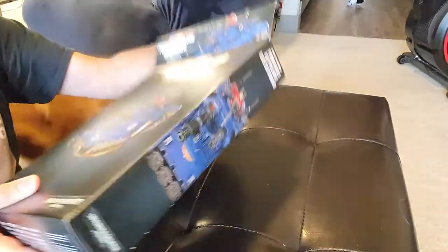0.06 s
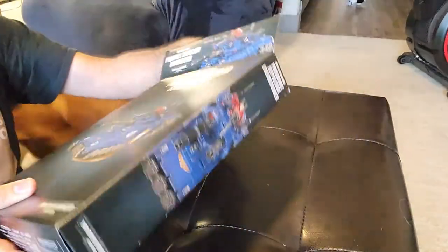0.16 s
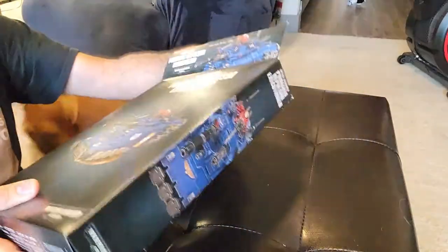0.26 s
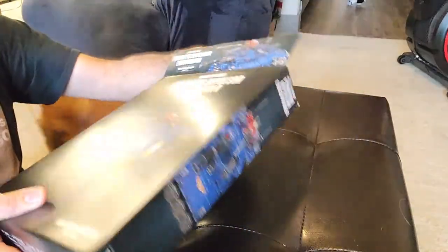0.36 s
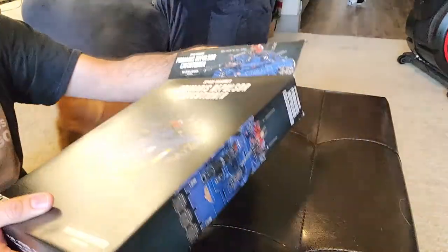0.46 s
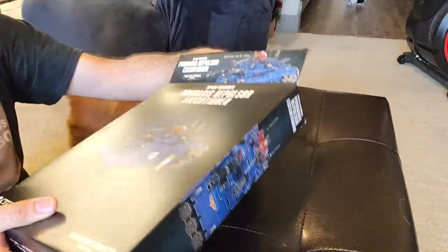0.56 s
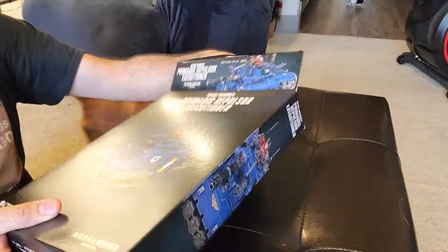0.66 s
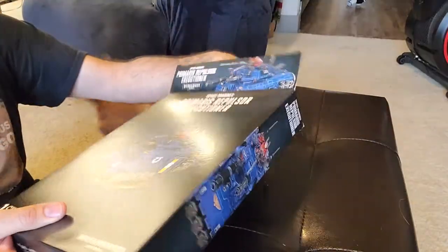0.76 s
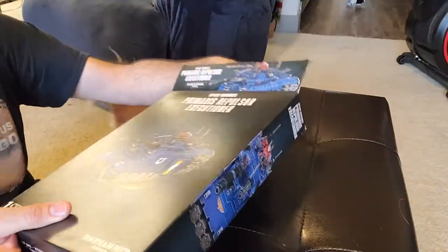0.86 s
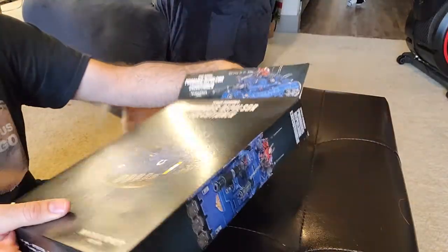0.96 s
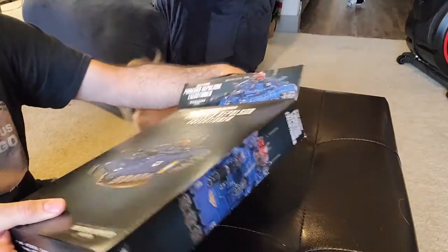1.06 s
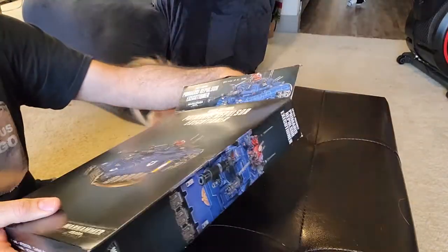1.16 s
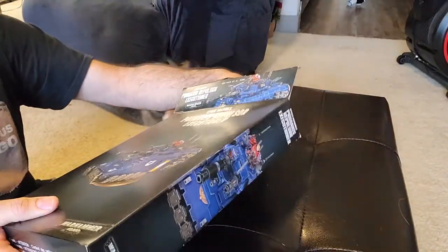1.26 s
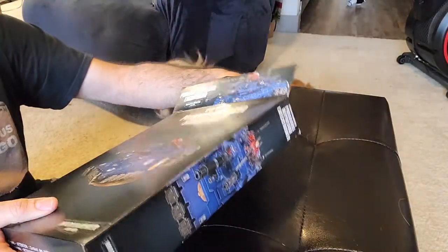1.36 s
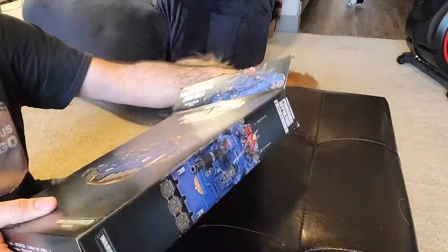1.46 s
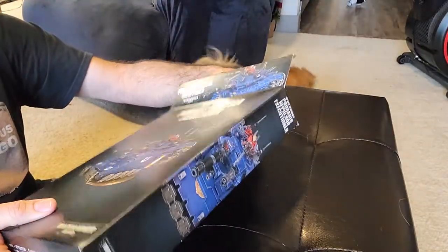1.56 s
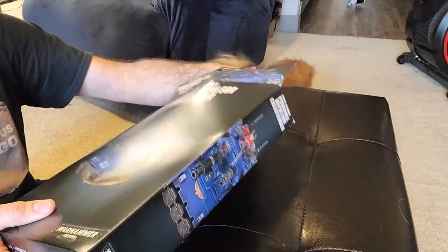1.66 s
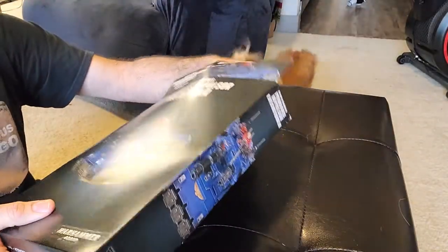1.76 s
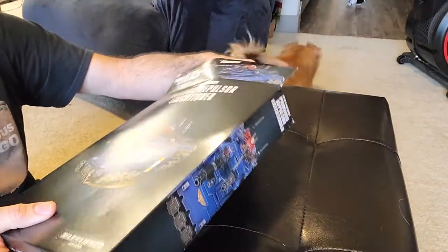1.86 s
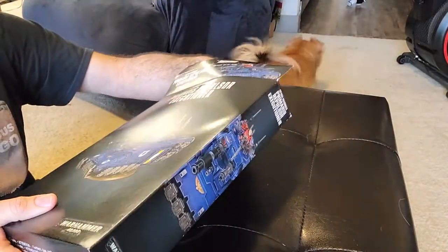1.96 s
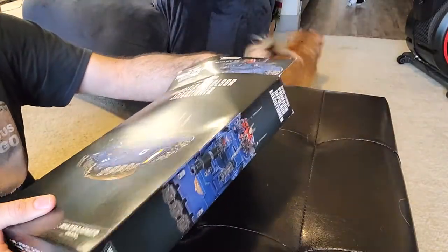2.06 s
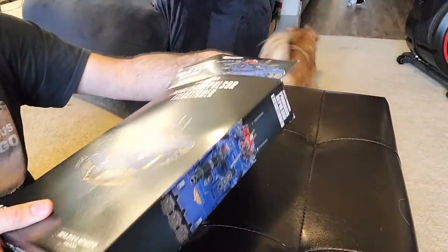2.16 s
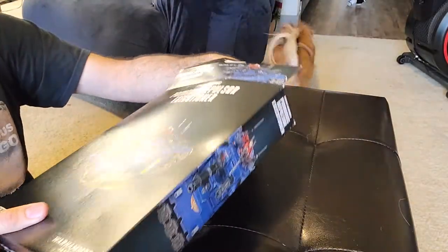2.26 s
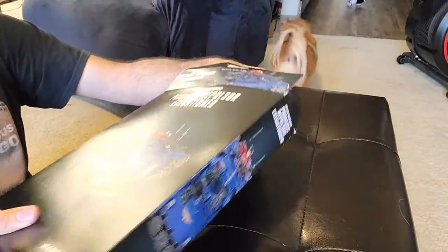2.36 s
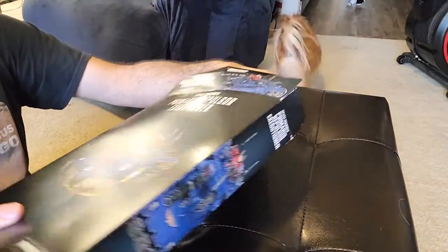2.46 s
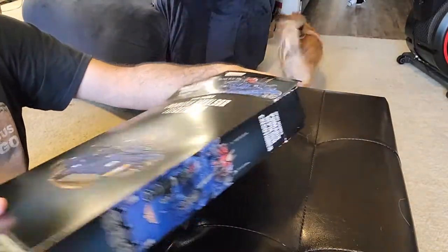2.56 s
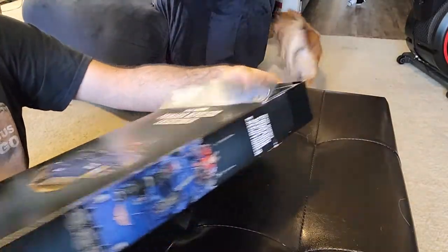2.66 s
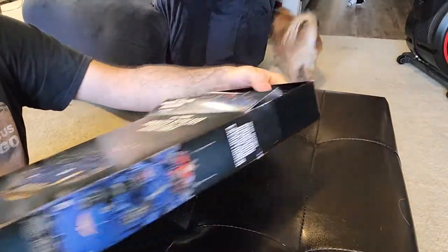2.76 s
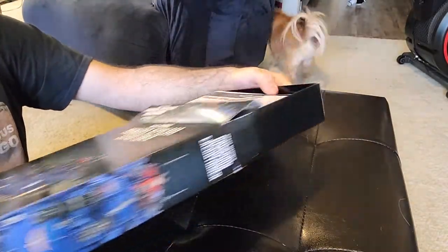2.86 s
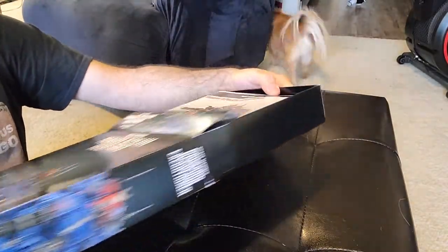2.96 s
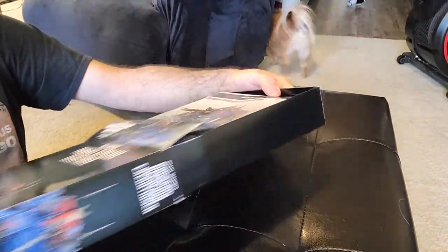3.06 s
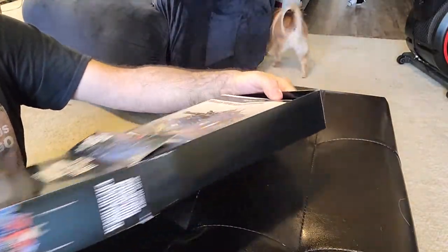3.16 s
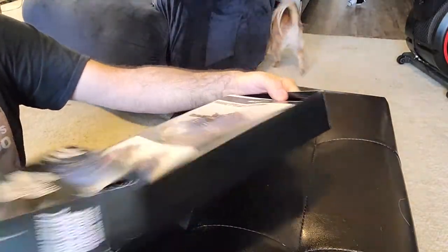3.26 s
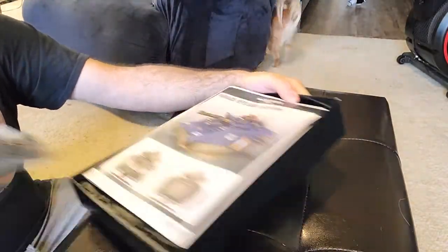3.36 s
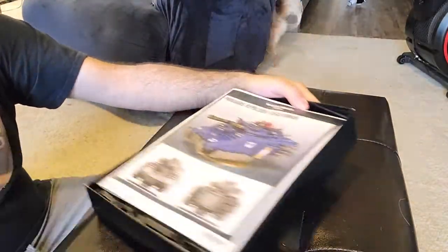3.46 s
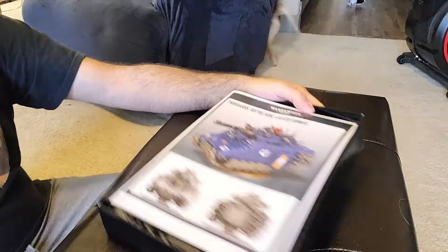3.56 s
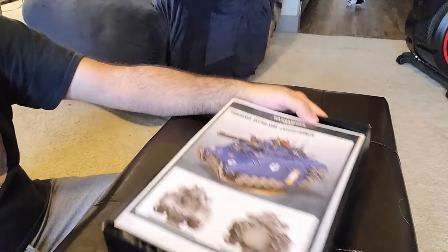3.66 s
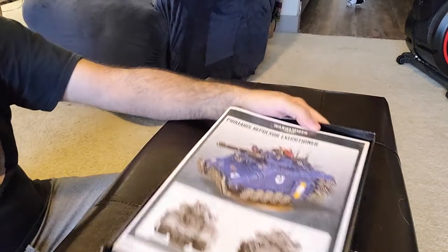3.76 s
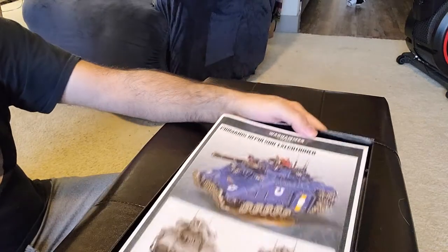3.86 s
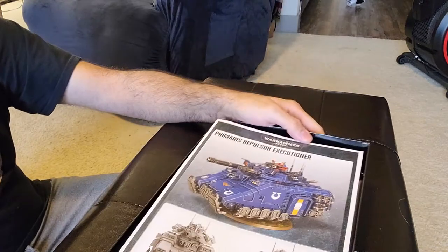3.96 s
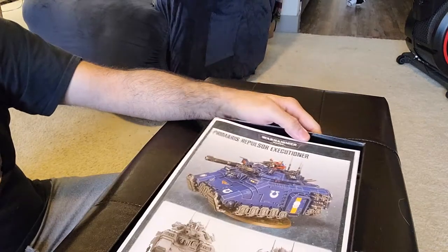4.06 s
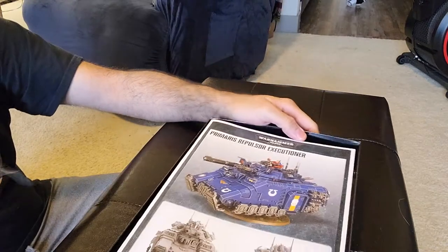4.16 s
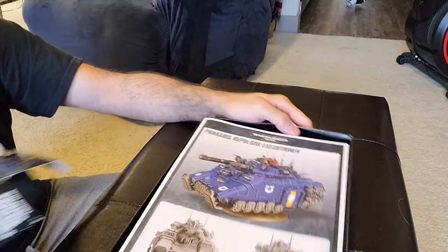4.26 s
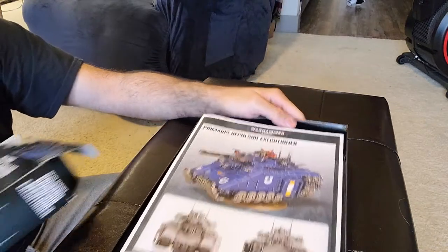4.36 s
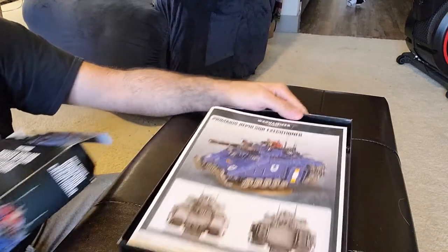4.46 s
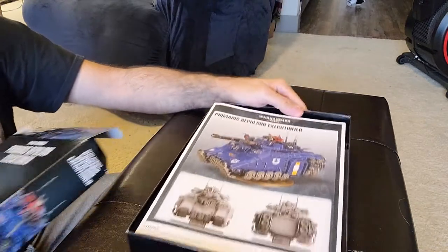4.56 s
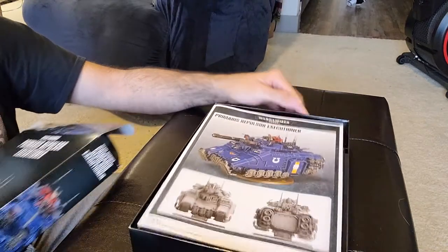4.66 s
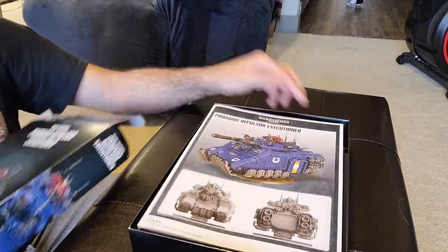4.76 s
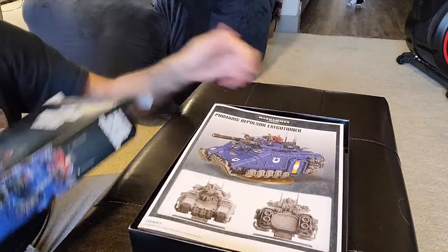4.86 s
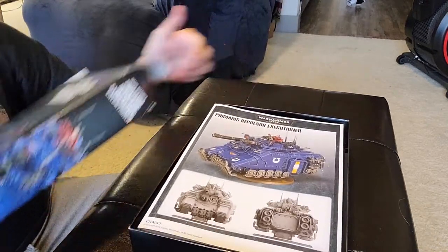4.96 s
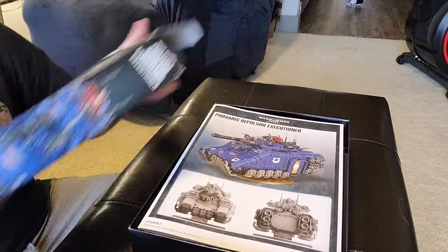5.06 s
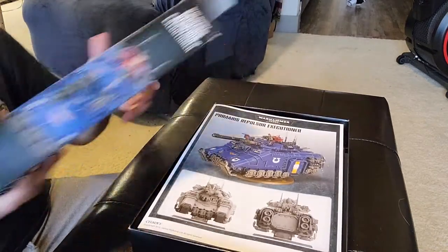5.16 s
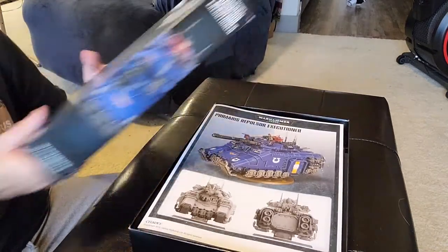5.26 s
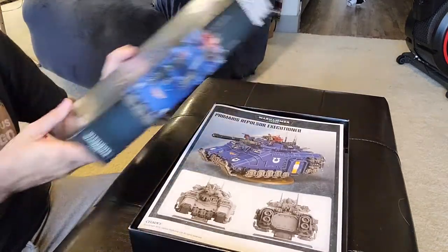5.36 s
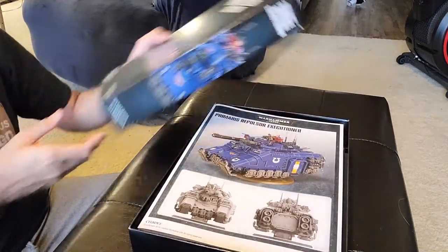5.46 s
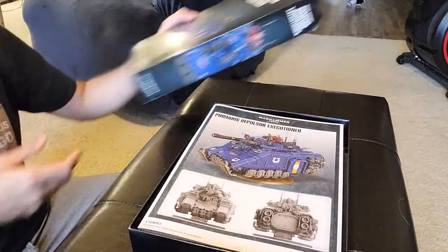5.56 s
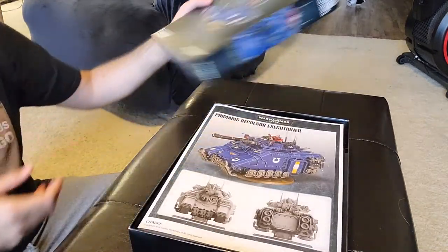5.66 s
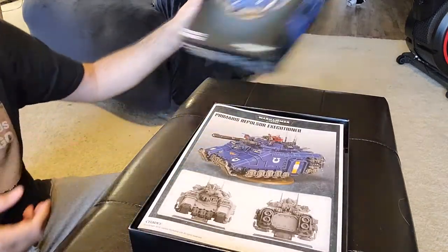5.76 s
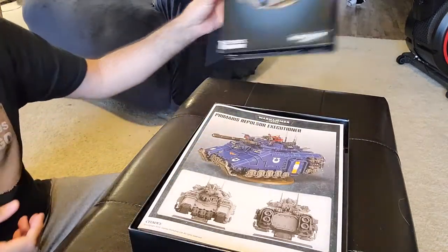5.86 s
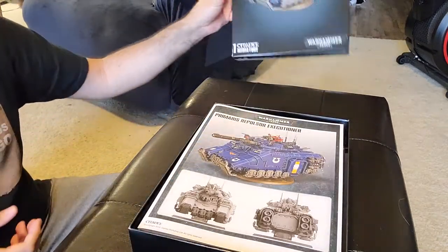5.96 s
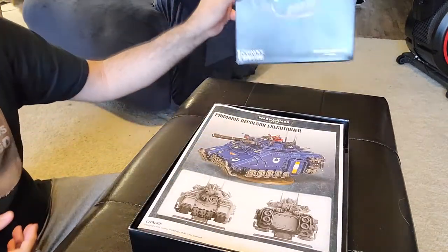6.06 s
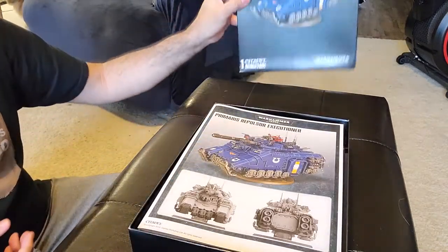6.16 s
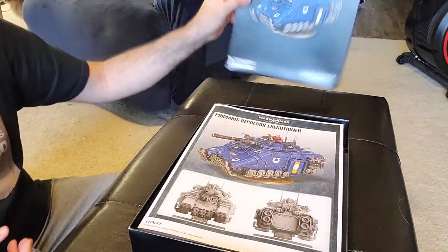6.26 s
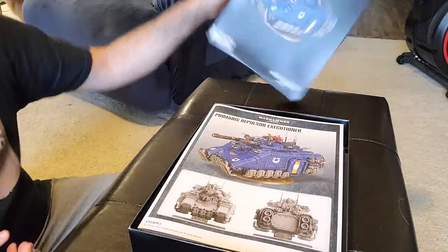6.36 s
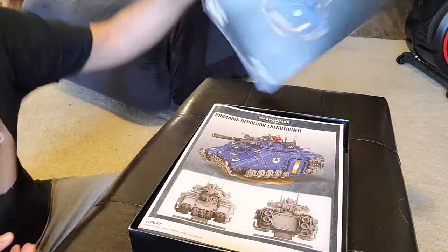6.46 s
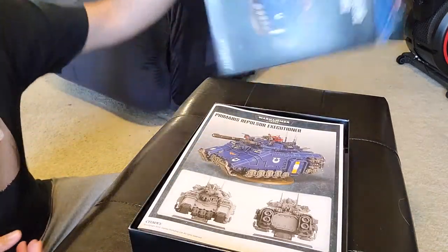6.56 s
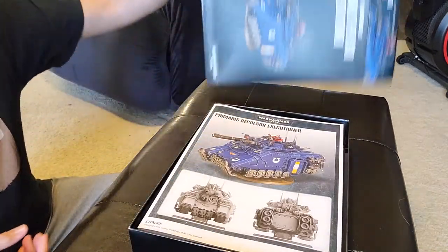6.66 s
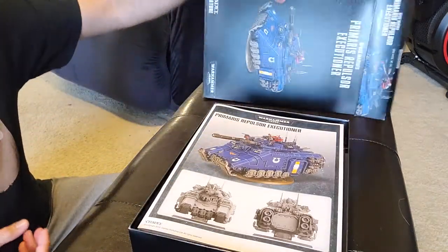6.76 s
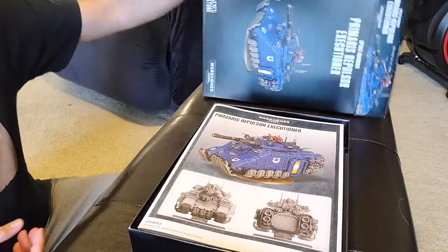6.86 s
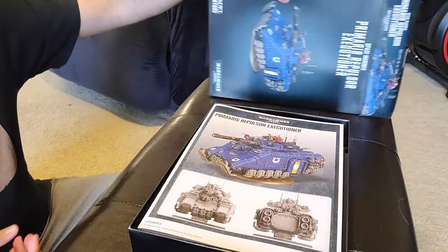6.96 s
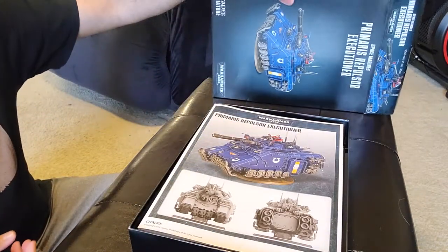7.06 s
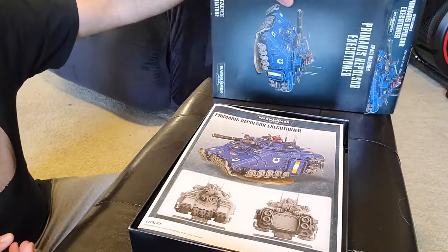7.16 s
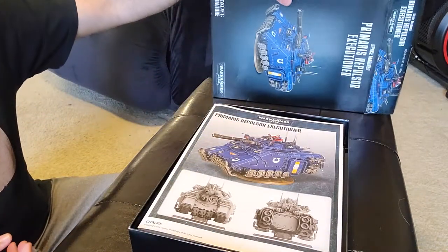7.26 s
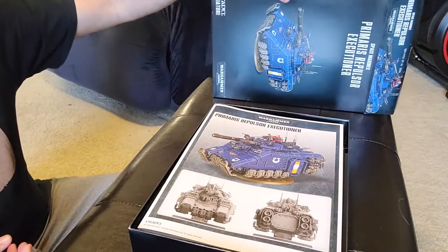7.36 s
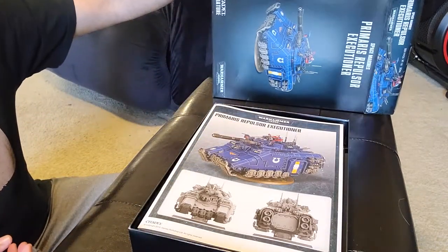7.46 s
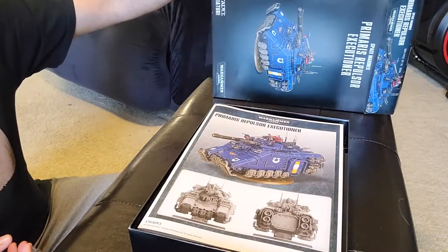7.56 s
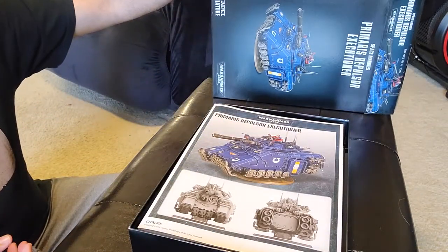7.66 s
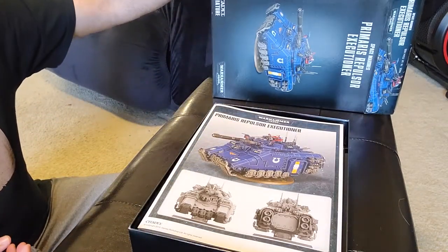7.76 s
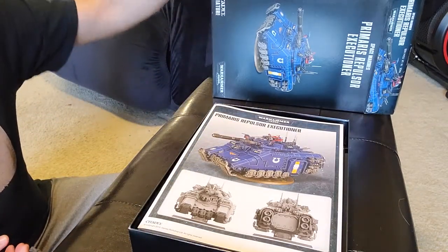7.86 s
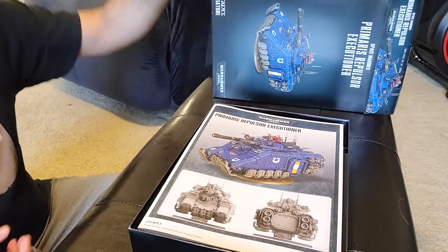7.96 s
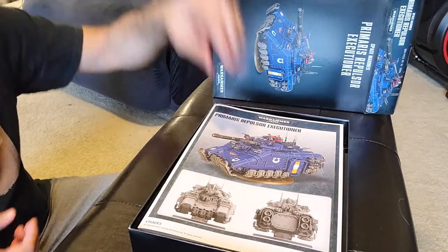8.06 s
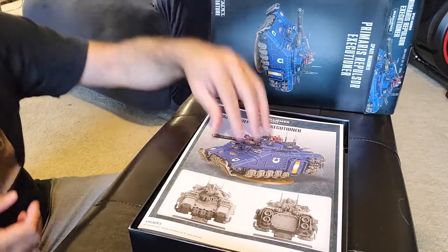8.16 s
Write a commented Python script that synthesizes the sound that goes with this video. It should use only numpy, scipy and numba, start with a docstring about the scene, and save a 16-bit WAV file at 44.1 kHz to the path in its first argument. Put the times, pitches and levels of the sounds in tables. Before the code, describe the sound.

Stereo close microphones hear thin card handled indoors: dry finger scuffs and small taps, a burst of boxy knocks, then about a second of coarse rubbing whose hollow tone rises slightly as the box opens, finished by a crisp double knock. Quiet taps, a brief crisp rustle and muffled bumps follow, then a padded thud as the card is put down. Short room echo, soft low hush with faint hum, and a faint distant whine near the end.

```python
"""Hands turn a glossy cardboard box, slide its sleeve off the tray and stand it on a padded seat, close by.
Friction and impact forces excite one body: panel modes, the air column in the sleeve, papery hiss, low thump.
Two microphone ports hear it with a moving lag and balance; thin card adds many short modes at each port.
A feedback delay network gives a short room echo. Near the end thin tones whine faintly.
Behind lies the hush of a quiet carpeted room, as filtered noise, with wavering hum tones."""
import sys
import numpy as np
from scipy import signal
from scipy.fft import rfft, irfft
from scipy.io import wavfile
from scipy.ndimage import uniform_filter1d, map_coordinates
from numba import njit

SR = 44100
rng = np.random.default_rng(int(sys.argv[2]) if len(sys.argv) > 2 else 0)


def master_out(mix):
    """Clip the mix to full scale and print it as 16-bit PCM to the path in sys.argv[1]."""
    frames = np.transpose(np.atleast_2d(mix))
    ceiling = np.clip(frames, -1, 1)
    pcm = np.round(ceiling * 32767).astype(np.int16)
    wavfile.write(sys.argv[1], SR, pcm)


def volts(x):
    """Linear amplitude factor 10**(x/20) for a level x in dB, scalar or array-like."""
    e = np.asarray(x, float) / 20
    return 10 ** e


N = 362766
TIME = np.arange(N) / SR


def level(x, db=0):
    """Energy normalisation: scales a signal to an rms level in dB."""
    return x * volts(db) / np.sqrt(np.mean(x ** 2))


def curves(table):
    """Linear interpolation: the columns of a table joined by straight lines in time."""
    s, *columns = np.transpose(table)
    return [np.interp(TIME, s, c) for c in columns]


def colour(x, points):
    """Minimum-phase filtering: a causal filter of unit energy shaped by (Hz, dB) points."""
    hz, db = np.transpose(points)
    bins_hz = np.arange(1025) * SR / 2048
    gain_db = np.interp(np.log(bins_hz + 1), np.log(hz), db)
    # folding the cepstrum onto positive times makes the filter causal
    cepstrum = irfft(np.log(volts(gain_db)))
    cepstrum[1:1024] *= 2
    cepstrum[1025:] = 0
    taps = irfft(np.exp(rfft(cepstrum)))
    return signal.oaconvolve(x, taps / np.linalg.norm(taps))[:N]


@njit
def svf(x, hz, width):
    """Second-order resonance: a state-variable band-pass with a moving centre and gain 1 there."""
    y, band, low = np.empty(len(x)), 0., 0.
    for i in range(len(x)):
        g, k = np.tan(np.pi * hz[i] / SR), width / hz[i]
        v = (band + g * (x[i] - low)) / (1 + g * (g + k))
        band, low, y[i] = 2 * v - band, low + 2 * g * v, k * v
    return y


def ring(x, hz, width_hz):
    """Noise bandwidth: a resonance scaled to pass white noise at unchanged rms."""
    # the tiny offset keeps the filter states away from zero
    return svf(x + 1e-18, hz * np.ones(N), 1. * width_hz) / np.sqrt(np.pi * width_hz / SR)


def walk(rate):
    """Band-limited fluctuation: random levels held 1 / rate s and slewed twice, with a spread near 1."""
    k = max(int(SR / rate), 1)
    steps = np.repeat(rng.standard_normal(N // k + 1), k)
    return 1.3 * uniform_filter1d(uniform_filter1d(steps, k), k)[:N]


PEAK_ROUND = .12  # share of the rise or fall over which a peak is rounded


def swells(rows):
    """Exponential growth and decay: power that rises to a rounded peak and falls at steady dB rates."""
    out = np.zeros(N)
    for s, db, rise, fall in rows:
        rise, fall = max(rise, .005), max(fall, .005)
        a, b = max(int((s - 3 * rise) * SR), 0), int((s + 3 * fall) * SR)
        away = np.maximum((s - TIME[a:b]) / rise, (TIME[a:b] - s) / fall)
        out[a:b] += volts(2 * (db + 20 * (PEAK_ROUND - np.hypot(away, PEAK_ROUND))))
    return out


def scrape(catch_db, rate, grain_db):
    """Dry friction: fibre-sized grains, none huge, whose grip catches and lets go."""
    size_db = grain_db * np.minimum(rng.exponential(size=N), 6)
    grains = rng.standard_normal(N) * volts(size_db)
    return level(grains * volts(catch_db * walk(rate)))


def box():
    """Source and resonator: rubbing and knocks sound through the same panels, sleeve air, paper and low body."""
    grip, hiss, rumble, air = rubbing()
    knock, crack, thud = blows()
    rub = scrape(catch_db=2., rate=70., grain_db=3.)
    # the fingers drive the panels near them most, around 630 Hz
    rub = volts(-3) * grip * (rub + .25 * ring(rub, 630., 400.))
    force = knock + rub
    sleeve, sleeve_db = sleeve_air(force)
    body = (panel_modes(force) + volts(sleeve_db) * sleeve) / np.sqrt(1 + volts(2 * sleeve_db))
    snap = sheet_radiation(crack, volts(-15.0) * crack)
    sheet = snap + volts(-0.5) * paper(hiss, air)
    near = body + low_body(thud, rumble) + squeaks() + volts(0.5) * sheet
    wide = volts(3.5) * card(sheet + volts(-15.5) * body)
    return near, wide


# the tray slides out of the sleeve, as relative force levels:
# start_s [s], box_db [dB], hiss_db [dB], rumble_db [dB]
SLIDE_FORCE = [(2.19, -76.5, -83, -78), (2.25, -49, -61.5, -64), (2.27, -52, -63, -60),
               (2.3, -45, -62.5, -60), (2.36, -33, -43, -61), (2.43, -37, -47, -62),
               (2.527, -29.5, -41.5, -46.5), (2.56, -36, -37.5, -45.5), (2.62, -28.5, -36, -34.5),
               (2.68, -30, -38, -52), (2.78, -31, -36, -61), (2.88, -30.5, -37.5, -44),
               (2.94, -34, -38.5, -46), (2.99, -29, -40.5, -44.5), (3.03, -34, -38, -49.5),
               (3.14, -34, -43.5, -47), (3.2, -33, -39, -45), (3.24, -38.5, -50, -40),
               (3.29, -29.5, -37, -31), (3.36, -39.5, -39, -39), (3.42, -41.5, -47.5, -49.5),
               (3.51, -66, -62, -73), (3.6, -93, -92, -90)]
# the grip that never rests wholly, as relative force levels:
# start_s [s], box_db [dB], hiss_db [dB], rumble_db [dB]
GRIP_FORCE = [(0, -64, -59.5, -60.5), (.3, -68, -75, -61), (.5, -72, -76.5, -67), (.75, -65, -72, -62),
              (1., -82, -83, -81), (1.4, -58, -74, -58.5), (1.6, -52, -63, -49), (1.75, -55, -61, -55),
              (1.9, -54, -56, -56), (2.1, -71, -76, -63.5), (3.55, -61, -69, -57.5),
              (3.8, -62.5, -68, -63.5), (4.1, -67, -75, -67.5), (4.3, -69.5, -75.5, -64),
              (4.55, -64, -75, -69), (4.72, -58, -64, -47), (5., -88, -80.5, -78), (5.32, -72, -69.5, -47),
              (5.45, -76, -75, -71), (5.8, -74.5, -76, -64), (6.2, -80, -82, -78.5),
              (6.38, -69.5, -76, -60), (6.68, -72.5, -82.5, -72.5), (6.78, -62, -59, -36.5),
              (6.93, -73, -72.5, -62.5), (7.2, -76.5, -85, -68.5), (8.2, -85, -92.5, -70)]
# scuffs of fingers and card, slopes shorter than 5 ms are set to 5 ms:
# peak_s [s], box_db [dB], hiss_db [dB], rise_s [s per 20 dB], fall_s [s per 20 dB]
SCUFFS = [(0.002, -37.5, -46.5, .01, 0.0354), (0.166, -59, -67, -0.14, 0.19), (0.24, -61, -62, 0.16, -0.07),
          (0.412, -56, -58, .08, -0.08), (0.678, -38.5, -52.5, 0.0768, 0.04),
          (0.776, -38.5, -49, 0.0549, 0.06), (1.084, -62.5, -72, 0.2, 0.3), (1.255, -48, -62, .09, 0.16),
          (1.299, -48, -61.5, 0.01, 0.18), (1.426, -49.5, -65.5, 0, 0.06), (1.58, -44.5, -51.5, 0, 0.11),
          (1.675, -45, -57, 0.07, 0.13), (1.748, -42, -52.5, -0.0445, 0.1), (1.775, -37, -62, 0.03, 0.08),
          (1.893, -35.5, -48.5, 0.04, .07), (2.044, -50.5, -57.5, -0.04, .14),
          (3.537, -38.5, -57.5, -0.16, 0.02), (3.606, -56.5, -64, 0.5, 0.15), (3.655, -53, -63, -0.2, .12),
          (4.123, -51, -55.5, -0.04, 0.04), (4.238, -59.5, -72, 0.33, -0.1), (4.4, -66, -67.5, 0.23, 0.46),
          (4.57, -56.5, -71, .06, .12), (4.664, -42, -49.5, .065, .12), (4.74, -46, -53, 0.04, 0.1245),
          (5.18, -57.5, -63.5, -0.02, .14), (5.305, -47.5, -57.5, 0.02, 0.1),
          (5.498, -49.5, -53.5, 0.08, 0.0358), (5.719, -53, -59.5, -0.02, 0.03),
          (5.835, -57, -71, .06, 0.16), (6.09, -62.5, -69, 0.05, .2), (6.365, -42.5, -51, 0.0255, 0.0848),
          (6.633, -62.5, -74.5, 0.24, 0.14), (6.763, -40.5, -52, 0.04, 0.03),
          (6.816, -38, -47, -0.04, 0.01), (6.872, -44, -62.5, 0.0345, 0.02), (7.152, -65, -73, 0.26, 0),
          (7.31, -68, -88, 0.15, -0.5), (7.552, -70, -90, 0.6, 0.2), (7.814, -70, -95, -0.2, -0.1),
          (8.205, -67, -57, 0.02, 1.2)]
# airy rustles, perhaps cloth, with the same shortest slope:
# peak_s [s], level_db [dB], rise_s [s per 20 dB], fall_s [s per 20 dB]
RUSTLES = [(0.24, -65, 0.1, .06), (0.4, -67, -0.02, 0.16), (1.574, -61.5, 0.04, 0.3), (3.7, -65, .5, 0.43),
           (4.125, -66, -0.2, .04), (4.42, -68.5, .2, 0.58), (4.672, -45.5, 0.0151, 0.0441),
           (4.7, -75, -0.05, 0.21)]


def rubbing():
    """Incoherent addition: slide, grip and scuffs add in power to force gains on box, hiss, rumble and air."""
    power = volts(2 * np.array(curves(SLIDE_FORCE))) + volts(2 * np.array(curves(GRIP_FORCE)))
    s, box_db, hiss_db, rise, fall = np.transpose(SCUFFS)
    body = power[0] + swells(zip(s, box_db, rise, fall))
    hiss = power[1] + swells(zip(s, hiss_db, rise, fall))
    air = hiss * volts(2 * -16) + swells(RUSTLES)
    return np.sqrt([body, hiss, power[2], air])


# knocks and taps, crack_db relative to the knock:
# start_s [s], level_db [relative dB], crack_db [dB], pitch_hz [Hz], rattle_t60_s [s]
KNOCKS = [(0.032, -37.5, -30, 460, 0.09), (0.201, -38.5, -1.5, 750, 0.11), (0.415, -61.5, 12, 250, 0.043),
          (0.719, -48.5, -21, 487, 0.055), (0.9, -57, -8.5, 764, 0.051), (1.452, -50, -14, 700, 0.045),
          (6.21, -57, -15.5, 900, .05), (6.625, -58.5, -12.5, 803, .05), (1.074, -48.5, -17.5, 743, 0.15),
          (1.201, -48, -18, 484, 0.088), (1.288, -40, -16.5, 740, 0.098), (1.546, -37.5, -19, 463, 0.081),
          (1.569, -36, -21, 762, 0.063), (1.63, -23, -29, 348, 0.19), (1.638, -19, -24.5, 500, 0.066),
          (1.658, -29, -16, 805, 0.056), (1.672, -29.5, -15, 387, 0.023), (1.829, -35, -21, 500, 0.028),
          (1.879, -29, -17, 540, 0.082), (2.23, -36, -6, 523, 0.064), (2.271, -36, -20, 740, 0.19),
          (2.631, -19, -30, 270, 0.055), (2.632, -13.5, -22.5, 524, 0.035),
          (2.679, -21.5, -14.5, 610, 0.051), (3.27, -26, -12.5, 575, 0.023),
          (3.298, -22.5, -17.5, 270, 0.18), (3.316, -13, -2.5, 660, 0.11), (3.324, -18, -10, 507, 0.053),
          (3.531, -41, -18.5, 640, 0.083), (3.695, -44, -15, 646, 0.1), (4.078, -49.5, -18, 620, 0.053),
          (4.123, -50, -30, 748, 0.029), (4.219, -48.5, -21, 363, 0.039), (4.455, -49, -22, 530, 0.067),
          (4.562, -65, 3.5, 960, .02), (4.574, -53, 3.5, 960, 0.023), (4.67, -35.5, -0.5, 690, 0.096),
          (4.749, -39, 1, 720, 0.15), (4.801, -54.5, 0, 958, .05), (5.154, -50, -12, 506, 0.05),
          (5.3, -43.5, -20, 507, 0.062), (5.715, -51.5, -9, 703, 0.077), (6.355, -35.5, -26, 730, 0.04),
          (6.731, -31, -6, 490, 0.14), (6.761, -32, -19, 285, 0.063), (6.813, -44, -10, 690, 0.081),
          (6.864, -38, -20.5, 646, 0.11), (7.149, -56.5, -12, 619, 0.079), (8.197, -45, -15, 933, 0.16)]
# soft thumps of the whole box: start_s [s], level_db [relative dB]
THUMPS = [(0.459, -46), (0.719, -48), (1.569, -43), (1.631, -33), (1.638, -32), (1.658, -32), (1.876, -44),
          (2.63, -35), (3.27, -39), (3.315, -36), (4.078, -61), (4.668, -50.5), (5.279, -46), (5.3, -45),
          (5.342, -39.5), (6.731, -36), (6.755, -29), (6.775, -39), (6.814, -48), (6.84, -35), (6.864, -44),
          (8.197, -53)]
THUMP_T60_S = .07


def blows():
    """Impact excitation: a first contact, then a dying rattle, as forces on panels, paper and low body."""
    out, t = np.zeros((3, N + SR)), np.arange(SR // 4) / SR
    shove = 5.3 * t / 0.0034 * np.exp(-t / 0.0025)
    for s, db, crack_db, hz, t60 in KNOCKS:
        fade = np.exp(-np.log(1000) * t / max(t60, .01))
        rattle = rng.standard_normal((3, len(t))) * fade
        push = rattle[0] + 5 * np.exp(-t / .0003)
        # the struck spot drives the panels near its own pitch
        push = signal.lfilter(*signal.iirpeak(hz, 2.5, fs=SR), push)
        push = push / np.linalg.norm(push) * np.linalg.norm(fade)
        crack = rattle[1] * (1 + 4.5 * np.exp(-t / 0.00083))
        thud = rattle[2] + shove
        gains = volts(db + np.array([[-12.], [crack_db - 3.5], [-28.]]))
        out[:, int(s * SR):][:, :len(t)] += gains * np.array([push, crack, thud])
    for s, db in THUMPS:
        rattle = rng.standard_normal(len(t)) * np.exp(-np.log(1000) * t / THUMP_T60_S)
        out[2, int(s * SR):][:len(t)] += volts(db - 6) * (rattle + shove)
    return out[:, :N]


# bending modes of the cardboard panels: mean_pitch_hz [Hz], width_hz [Hz], level_db [relative dB]
PANEL_MODES = [(264, 34, -2), (344.8, 60, 0), (479, 120, 1.5), (610, 70, 2), (760, 93, 0), (980, 28, -7.5),
               (986, 84, -2.5), (1250, 150, -2), (1565, 150, -6.5), (1890, 62, -10), (2100, 43, -15.5),
               (2684, 130, -13), (3250, 66, -14.5)]


def panel_modes(force):
    """Modal superposition: resonances of alternating sign that drift as the card bends in the hands."""
    share = volts(np.array(PANEL_MODES)[:, 2])
    share = share / np.linalg.norm(share)
    out = np.zeros(N)
    for k, (hz, width, _) in enumerate(PANEL_MODES):
        drifting_hz = hz * (1 + 0.066 * walk(5.))
        out += (-1) ** k * share[k] * ring(force, drifting_hz, width)
    return out


# air inside the sleeve, rising as the tray leaves it, level_db over the panels:
# start_s [s], pitch_hz [Hz], level_db [dB]
SLEEVE_AIR = [(0, 700, -13), (2.25, 537, -20.5), (2.5, 534, 3.5), (2.9, 562.6, 2.5), (3.2, 636, 1),
              (3.4, 630, -13.5), (8.2, 654.6, -17.5)]
# modes of that air column: multiple [of its pitch], width_hz [Hz], level_db [relative dB]
SLEEVE_MODES = [(1, 140, 0.5), (3, 120, -8.5), (5, 150, -14.5)]


def sleeve_air(force):
    """Quarter-wave resonance: a tube shut at one end rings at odd multiples; also returns its level in dB."""
    pitch_hz, level_db = curves(SLEEVE_AIR)
    tone = sum(volts(db) * ring(force, k * pitch_hz, width) for k, width, db in SLEEVE_MODES)
    return tone, level_db


def low_body(thud, rumble):
    """Low-order resonance: thuds and rumbling friction through broad modes, cut below 60 Hz."""
    low = thud + volts(4.5) * rumble * scrape(catch_db=0.0, rate=28.0, grain_db=-0.5)
    modes = ring(low, 65.0, 84.0) + volts(-1.0) * ring(low, 140., 90.)
    low = ring(modes, 100., 370.0) * volts(-25.0)
    return signal.sosfilt(signal.butter(3, 60., "high", fs=SR, output="sos"), low)


# papery spectrum: pitch_hz [Hz], level_db [relative dB per Hz]
PAPER_SPECTRUM = [(700, -25), (1300, 4), (2000, -2), (3300, -2.5), (5000, -6), (7500, -12), (8600, -25),
                  (16000, -43.5)]
# airy top of the hiss: pitch_hz [Hz], level_db [relative dB per Hz]
AIR_SPECTRUM = [(5000, -30.5), (8500, -2.5), (10000, 1), (13500, -0.5), (15500, -2.5), (17000, -33)]


def sheet_radiation(force, airy_force):
    """Spectral shaping: a papery band and an airy top, each driven by its own force."""
    return colour(force, PAPER_SPECTRUM) + colour(airy_force, AIR_SPECTRUM)


def paper(hiss, air):
    """Friction noise: fibres tearing past each other give an even hiss and its airy top."""
    force = scrape(catch_db=1., rate=70., grain_db=3.)
    return sheet_radiation(hiss * force, volts(-3.0) * air * force)


# short squeaks of skin or glossy card, overtone_db relative to the fundamental:
# start_s [s], length_s [s], mean_pitch_hz [Hz], level_db [relative dB], overtone_db [dB]
SQUEAKS = [(0.23, 0.074, 2850, -59.5, -13), (0.355, 0.093, 2800, -55, -7), (1.244, 0.091, 3250, -57.5, -15),
           (1.567, 0.029, 760, -35, -37), (3.595, 0.027, 1450, -59, -5), (4.114, 0.035, 740, -44, -34.5),
           (5.166, 0.03, 2120, -58, -16), (5.22, 0.028, 2100, -61, -12), (5.298, .014, 2240, -52, -20),
           (5.432, 0.037, 3780, -62, -13)]


def squeaks():
    """Stick-slip oscillation: an unsteady, broken stack of overtones under a smooth swell."""
    out = np.zeros(N)
    turns = np.cumsum(1 + .045 * walk(500.)) / SR
    grip = volts(5.5 * walk(130.))
    for s, length, hz, db, over_db in SQUEAKS:
        span = slice(int(s * SR), int((s + length) * SR))
        phase = 2 * np.pi * hz * turns[span]
        swell = np.abs(np.sin(np.pi * (TIME[span] - s) / length)) ** 0.68
        # overtones 2 to 5, those below 9 kHz only
        overtones = sum(np.sin(k * phase) * (k * hz < 9000) for k in range(2, 6))
        stack = np.sin(phase) + volts(over_db) * overtones
        out[span] += volts(db) * grip[span] * swell * stack
    return out


CARD_T60_S = 0.037


def card(forces):
    """High modal density: thin card answers with many short close modes, other ones at each port."""
    t = np.arange(1024) / SR
    tails = rng.standard_normal((2, 9, len(t))) * np.exp(-np.log(1000) * t / CARD_T60_S)
    tails = tails / np.linalg.norm(tails, axis=2, keepdims=True)
    # the mixture of the nine tails changes as the grip shifts
    grip = np.array([walk(25.) ** 3 for _ in range(9)])
    grip = grip / np.linalg.norm(grip, axis=0)
    return signal.oaconvolve((grip * forces)[None], tails, axes=2)[:, :, :N].sum(axis=1)


# where the contact is, as the delay of the left port and its level over the right:
# start_s [s], left_lag [samples], left_minus_right_db [dB]
PLACE = [(0, -3.5, 0.5), (.6, -3.5, 2), (1.1, -4.5, -3), (1.9, -3, 0), (2.2, 7, 0), (2.8, 6, -4.5),
         (3.3, 4.5, -3), (3.7, 1, -2), (4.2, -3, -4), (4.7, -7.5, 0), (5.2, -3.5, 0), (6, -4, -.5),
         (8.2, -4.5, 0)]


def ports(x):
    """Interchannel time and level difference: two ports hear the box with a lag and balance set by its place."""
    lag, pan_db = curves(PLACE)
    side = np.array([[.5], [-.5]])
    heard = [map_coordinates(x, [np.arange(N) - v], order=3, mode="nearest") for v in side * lag]
    return np.array(heard) * volts(side * pan_db)


@njit
def walls(x, lags, gain, damp):
    """Feedback delay network: eight delay lines that feed each other, duller on every round."""
    line, soft, out = np.zeros((8, 4096)), np.zeros(8), np.zeros((2, len(x)))
    for i in range(len(x)):
        total = 0.
        for k in range(8):
            soft[k] += (1 - damp) * (gain[k] * line[k, (i - lags[k]) & 4095] - soft[k])
            total += soft[k]
            out[k % 2, i] += soft[k]
        for k in range(8):
            line[k, i & 4095] = x[i] + soft[k] - total / 4
    return out


ROOM_T60_S, ROOM_DAMP, ECHO_DB = 0.23, 0.33, -15


def room_echo(x):
    """Reverberation: wall delays whose gains follow the decay time, before damping of the treble."""
    lags = rng.integers(400, 1900, size=8)
    gains = volts(-60 * lags / SR / ROOM_T60_S)
    return volts(ECHO_DB) * walls(x, lags, gains, ROOM_DAMP)


# faint whines, one list each, pitch and level wavering about the values:
# start_s [s], pitch_hz [Hz], level_db [dB of amplitude]
WHINES = [
    [(7.21, 1333, -65), (7.3, 1403, -64.5), (7.4, 1472, -68.5), (7.5, 1470, -68.5), (7.56, 1422, -73)],
    [(7.5, 1300, -68), (7.6, 1250, -72)],
    [(7.47, 790, -63), (7.52, 826, -68.5), (7.58, 844, -73)],
    [(7.79, 777, -70.5), (7.84, 800, -72)],
    [(7.83, 1234, -74), (7.9, 1215, -71.5), (7.98, 1187, -79)],
]


def whine():
    """Frequency modulation: thin wavering tones from across the room."""
    out = np.zeros(N)
    for table in WHINES:
        hz, db = curves(table)
        sounding = (TIME > table[0][0]) & (TIME < table[-1][0])
        on = uniform_filter1d(1. * sounding, size=800)
        phase = 2 * np.pi * np.cumsum(hz * (1 + .02 * walk(150.))) / SR
        out += on * volts(db + 2 * walk(60.)) * np.sin(phase)
    return out


# spectrum of the hush: pitch_hz [Hz], level_db [relative dB per Hz]
HUSH_SPECTRUM = [(12, -31), (20, -9.5), (45, 0), (182, -14), (241, -9), (499, -23), (759, -21), (1000, -27),
                 (1290, -26), (1660, -32), (5380, -42), (7520, -32.5), (8650, -42.5), (14700, -44),
                 (16000, -51)]
# appliance hum, its level wavering about the value: pitch_hz [Hz], level_db [dB rms]
HUM = [(29.5, -64.5), (59, -78.5), (120, -75.5), (240, -70)]
HUSH_DB = -62.5  # rms


def room_tone():
    """Diffuse field: hush that is alike at both ports in the bass only, under wavering appliance hum."""
    mid, side = (colour(rng.standard_normal(N), HUSH_SPECTRUM) for _ in range(2))
    side = signal.sosfilt(signal.butter(1, 450., "high", fs=SR, output="sos"), side)
    hush = level(mid + side * np.array([[1], [-1]]), HUSH_DB)
    hum = np.zeros(N)
    for hz, db in HUM:
        phase = 2 * np.pi * hz * TIME + 0.62 * walk(12.0)
        hum += np.sqrt(2) * volts(db + 1.5 * walk(15.0)) * np.sin(phase)
    return hush + hum


def scene():
    """Linear superposition: the box close by, its echo from the walls, the whine and the room tone."""
    near, wide = box()
    far = whine()
    return ports(near) + wide + room_echo(near + 2 * far) + far + room_tone()


def low_pass(x):
    """Removes everything above the highest recorded frequency."""
    return signal.sosfilt(signal.butter(12, 16640, fs=SR, output="sos"), x)


def record(dry):
    """Amplitude limiting: whatever exceeds full scale is clipped."""
    mix = np.clip(dry, -1, 1)
    return low_pass(mix)


dry = scene()
out = record(dry)
master_out(out)
```